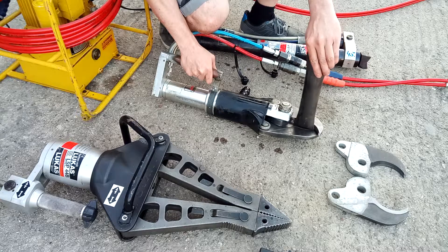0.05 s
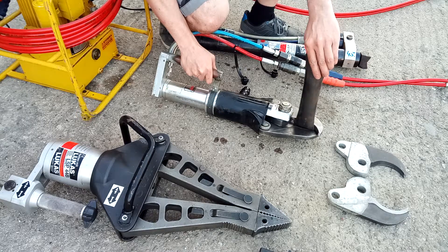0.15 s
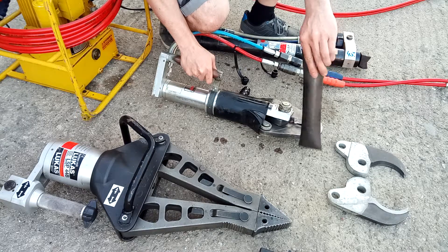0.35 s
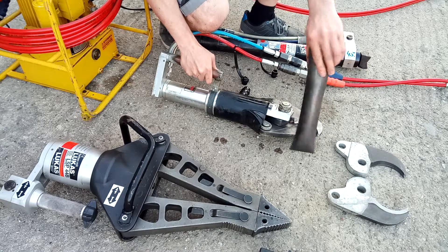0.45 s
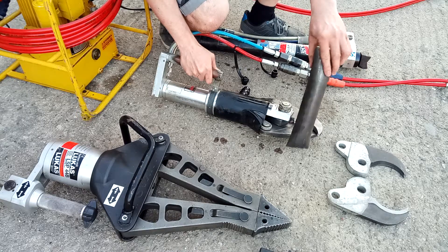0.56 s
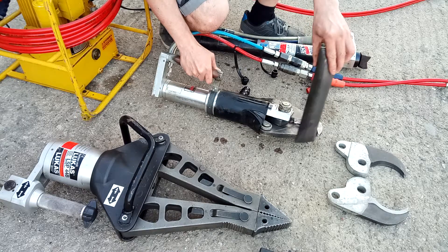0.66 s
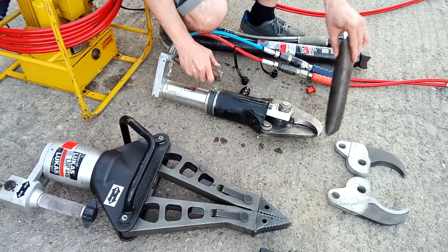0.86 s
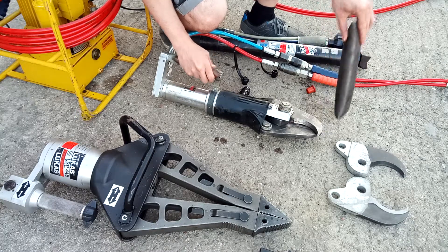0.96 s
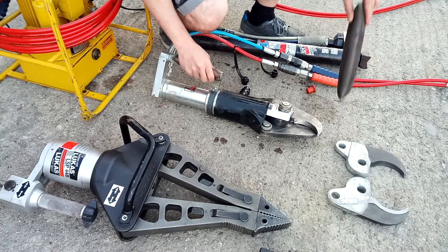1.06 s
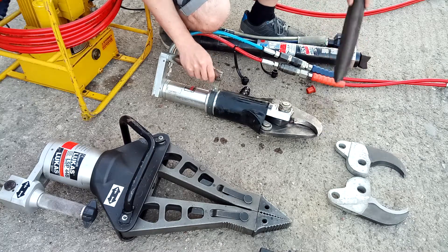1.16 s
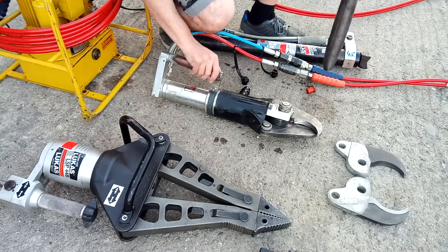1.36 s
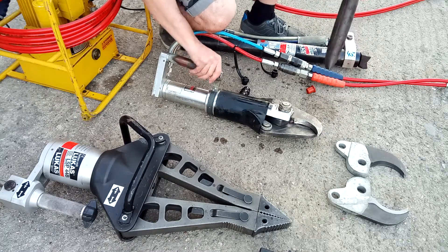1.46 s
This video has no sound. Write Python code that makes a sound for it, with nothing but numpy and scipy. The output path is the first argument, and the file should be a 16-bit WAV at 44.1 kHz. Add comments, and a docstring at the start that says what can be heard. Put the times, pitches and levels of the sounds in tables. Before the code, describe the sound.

A hydraulic pump hammers about 25 times a second for 1.5 seconds, ticking and squirting over a droning hum. Steel squeals thinly in the straining cutter at 0.1 seconds. Near 0.25 the bar snaps loudly, clanks against the jaws and rings briefly. The pump dips, quickens around 0.4, then settles. A fainter squeal follows from 1.0 to 1.3, while light air puffs rumble on the microphone.

```python
"""A hydraulic piston pump hammers about 25 times a second, ticking and squirting over a droning hum.
Its strokes ring a cutter that strains on a steel bar, until the bar snaps, clanks against the jaws
and rings; the unloaded pump briefly speeds up. A limiter ducks everything around the snap.
Steel squeals thinly twice, and light air movement rumbles on the microphone."""
import sys
import numpy as np
from scipy.fft import rfft, irfft, next_fast_len
from scipy.io import wavfile
from scipy.ndimage import uniform_filter1d, minimum_filter1d, map_coordinates

SR = 44100
rng = np.random.default_rng(int(sys.argv[2]) if len(sys.argv) > 2 else 0)


def unload_audio(sound):
    """Save the sound as a 16-bit wav file, at the path given as the first command line argument."""
    columns = np.transpose(np.atleast_2d(sound))
    # keep every value between -1 and 1, then stretch to whole-number steps
    steps = np.round(np.clip(columns, -1, 1) * 32767)
    wavfile.write(sys.argv[1], SR, steps.astype(np.int16))


N = 66150

# The stroke's mix as the load changes: time_s, tick_db, squirt_db, knock_db
STROKE_MIX = [(0, -22.5, -28.5, -27.5), (.24, -24, -29, -25), (.37, -21, -34, -29), (.42, -25, -21, -28.5),
              (.5, -26, -20, -20), (.58, -24, -23.5, -25.5), (.69, -27, -22.5, -27.5),
              (.75, -29, -25, -21.5), (.82, -21, -23, -17), (.9, -22.5, -22, -21.5), (.98, -23.5, -23, -22),
              (1.04, -26, -21.5, -28), (1.13, -28, -23.5, -26.5), (1.18, -22.5, -20.5, -30),
              (1.24, -30, -27, -25), (1.38, -27, -25, -27.5), (1.425, -21.5, -22, -26.5),
              (1.5, -38, -24, -24.5)]
# The squirt trails the tick further once the load is gone: time_s, lag_s
SQUIRT_LAG = [(0, .001), (.37, .0015), (.45, .006), (.66, .0065), (.82, .004), (1.5, .004)]
# Tone colours of the valve tick, oil squirt and churning: frequency_hz, gain_db
TICK_EQ = [(1500, -18.5), (3000, -13), (4000, -5), (4700, -2), (5600, 3.5), (6300, 5), (6900, -15.5),
           (7600, -13.5), (8200, -43), (9800, -19), (11000, -33), (15000, -37)]
SQUIRT_EQ = [(500, -22.5), (1400, -8.5), (2000, -11.5), (2600, 3), (3000, 2), (3900, -8), (4700, 2.5),
             (5200, 6.5), (6100, 2), (6900, -13), (7600, -15.5), (8200, -22), (9800, -25), (11000, -32),
             (15000, -40)]
CHURN_EQ = [(30, -57), (100, -2), (300, -5.5), (500, -5), (750, 10), (1200, 0), (1700, -4), (2300, 1.5),
            (3100, -4.5), (3900, -9.5), (5200, -0.5), (6200, -3), (7200, -22.5), (9000, -31), (13000, -39),
            (15500, -34)]
# Resonances of the bright casing and the hollow tank: pitch_hz, width_hz, gain_db
CASING_MODES = [(2235, 12, -3), (2274, 73, 0.5), (2900, 36, -5.5)]
TANK_MODES = [(644, 38, -3), (850, 75, 7), (1012, 63, 8.5), (1046, 110, -0.5), (1392, 27, 5.5)]

def pump(knock_lead_s=.0019, tank_lag_s=.0053, tank_db=-28, churn_db=-33):
    """Each stroke: a valve ticks, the casing knocks, oil squirts and the tank answers, over churning."""
    tick_db, squirt_db, knock_db = curves(STROKE_MIX)
    lag, = curves(SQUIRT_LAG)
    tick = coloured(stroke_noise(alike=.45), TICK_EQ) * amp(tick_db)
    tick *= stroke_envelope(0, attack_s=.0005, hold_s=.0025, decay_s=.0032, tail_db=-24.5, scatter_db=.5)
    squirt = coloured(stroke_noise(alike=.55), SQUIRT_EQ) * amp(squirt_db)
    squirt *= stroke_envelope(lag, attack_s=.0017, hold_s=.0047, decay_s=.0056,
                              tail_db=-21, scatter_db=-1.9)
    knock = stroke_noise(alike=.85) * amp(knock_db)
    knock *= stroke_envelope(lag - knock_lead_s, attack_s=.00044, hold_s=.0024, decay_s=.0028,
                             tail_db=-6, scatter_db=-1.5)
    thud = stroke_noise(alike=.66) * amp(tank_db)
    thud *= stroke_envelope(lag + tank_lag_s, attack_s=.00071, hold_s=.0039, decay_s=.0021,
                            tail_db=-19, scatter_db=1.5)
    churn = amp(churn_db) * coloured(stroke_noise(alike=.44), CHURN_EQ)
    return tick + squirt + resonate(knock, CASING_MODES) + resonate(thud, TANK_MODES) + churn


# The pump's tempo, with a surge after the snap: time_s, strokes_per_s
PUMP_TEMPO = [(0, 24.24), (.3, 24.56), (.43, 26.45), (.64, 24.23), (.9, 24.96), (1.25, 24.5), (1.5, 25.74)]

def stroke_clock(first_stroke_s=.0072):
    """For each sample: the number of the stroke and the seconds since it began."""
    rate, = curves(PUMP_TEMPO)
    turns = np.cumsum(rate) / SR + 1 - first_stroke_s * rate[0]
    return turns.astype(int), turns % 1 / rate


def stroke_noise(alike):
    """Noise in which a share of the power, alike, repeats with every stroke."""
    _, age = stroke_clock()
    repeating = rng.standard_normal(SR)[(age * SR).astype(int)]
    return np.sqrt(alike) * repeating + np.sqrt(1 - alike) * rng.standard_normal(N)


def stroke_envelope(delay_s, attack_s, hold_s, decay_s, tail_db, scatter_db, tail_s=.017):
    """Every stroke rises, holds, dies quickly and leaves a short tail, each at its own strength."""
    number, age = stroke_clock()
    t = np.maximum(age - delay_s, 0)
    fall = np.exp(-np.maximum(t - hold_s, 0) / decay_s) + amp(tail_db) * np.exp(-t / tail_s)
    strength = amp(scatter_db * rng.standard_normal(number[-1] + 1))[number]
    return strength * (1 - np.exp(-t / attack_s)) * fall


# The break, then the clank on the jaws: start_s, ring_db, crack_db
STEEL_HITS = [(0.2555, 9.5, 10.5), (.2722, 2, -1.5)]
# Modes of the bar and jaws, one list each: pitch_hz, level_db, t60_s
RING_HZ = [425, 1645, 2470, 3189, 3314, 3576, 3621, 3971, 4337, 4595, 4941, 5190, 5222, 5326, 5469, 5830,
           5870, 6192, 7400, 8400, 9500, 10750, 11810]
RING_DB = [-14.5, -6, -10, -21.5, -20, -19.5, -26, -4.5, -5.5, -18, -2, 9, -7.5, -10.5, -10.5, -1, -14,
           -6.5, -28, -23, -36.5, -30, -37]
RING_T60_S = [0.045, 0.02, 0.026, 0.49, 0.52, 0.53, 0.3, 0.041, 0.16, 0.06, 0.24, 0.066, 0.15, 0.079, 0.14,
              0.11, 0.23, 0.16, 0.3, 0.069, 0.14, 0.14, 0.15]
# Tone colours of the hard crack and the bright rattle: frequency_hz, gain_db
CRACK_EQ = [(150, -16), (600, -14), (1000, -4), (1700, -0.5), (2800, -3), (4200, -2), (5300, -7),
            (6300, -10), (7200, -9.5), (9000, -20.5), (12000, -25.5), (15000, -28)]
RATTLE_EQ = [(150, -31), (400, -22), (1200, -14), (2600, -14), (3400, -5), (4300, 1), (5200, 1), (6100, 4),
             (6900, -13), (7500, -18), (8000, -25), (11000, -28), (15000, -37)]

def snap(attack_s=.00089, wander_rad=.25):
    """The bar breaks and strikes the jaws: each blow is a crack, a dense rattle and ringing steel."""
    out = np.zeros(N)
    for start_s, ring_db, crack_db in STEEL_HITS:
        t = np.maximum(np.arange(N) / SR - start_s, 0)
        ring = sum(decay(t, db, t60_s) * np.sin(2 * np.pi * hz * t + wander_rad * wobble(118.1))
                   for hz, db, t60_s in zip(RING_HZ, RING_DB, RING_T60_S))
        rattle = coloured(rng.standard_normal(N), RATTLE_EQ)
        rattle *= decay(t, db=2, t60_s=.04) + decay(t, db=-19, t60_s=.52)  # loud clash, faint tail
        crack = coloured(rng.standard_normal(N), CRACK_EQ) * decay(t, crack_db, t60_s=.026) * (t > 0)
        out += (amp(ring_db) * ring + rattle) * (1 - np.exp(-t / attack_s)) + crack
    return out


# The hum's main tone: time_s, pitch_hz, level_db
HUM_TONE = [(0, 745, -34.5), (.15, 752.6, -34), (.23, 741, -30), (.33, 734.7, -28), (.46, 744.8, -35),
            (.57, 729, -35.5), (.68, 731.8, -32.5), (.86, 738, -27), (.96, 739, -39.5), (1.14, 744, -36.5),
            (1.33, 740, -28), (1.41, 736, -38), (1.5, 742, -25.5)]
# Its octave: time_s, level_db
HUM_OCTAVE = [(0, -44.5), (.22, -43.5), (.36, -43.5), (.52, -36.5), (.65, -55.5), (1.5, -49)]
# Narrow noise bands that roughen it: pitch_hz, width_hz, gain_db
HUM_BANDS = [(735, 17, -1), (830, 10.6, -4.5)]

def hum(side_hz=839, side_db=-42, rough_db=-6, waver_db=.6, wander_rad=.7, pulse_db=2, crest_s=.02):
    """A wavering tone with its octave, a side tone and narrow noise, swelling after every stroke."""
    hz, db = curves(HUM_TONE)
    octave_db, = curves(HUM_OCTAVE)
    rate, = curves(PUMP_TEMPO)
    _, age = stroke_clock()
    phase = 2 * np.pi * np.cumsum(hz) / SR
    tone = np.sin(phase) * amp(db + waver_db * wobble(30.6))
    octave = np.sin(2 * phase + wander_rad * wobble(38.7)) * amp(octave_db)
    side = np.sin(2 * np.pi * side_hz * np.arange(N) / SR + wander_rad * wobble(14.66)) * amp(side_db)
    rough = amp(db.mean() + rough_db) * resonate(rng.standard_normal(N), HUM_BANDS)
    pulse = amp(pulse_db * np.cos(2 * np.pi * rate * (age - crest_s)))
    return (np.sqrt(2) * (tone + octave + side) + rough) * pulse


# Resonances of the cutter while its jaws bite: pitch_hz, width_hz, gain_db
CUTTER_MODES = [(1770, 830, -9), (3200, 140, -2.5), (4630, 97, -1.5), (5350, 60, -16), (6406, 95, 0)]

def cutter(gain_db=-24.5):
    """Until the bar breaks, every stroke rings the strained cutter."""
    strokes = stroke_noise(alike=.51)
    strokes *= stroke_envelope(0, attack_s=.00074, hold_s=.002, decay_s=.0038, tail_db=-13, scatter_db=.4)
    biting = np.arange(N) / SR < STEEL_HITS[0][0]
    return amp(gain_db) * resonate(strokes * biting, CUTTER_MODES)


# One squeal before the snap, a fainter one well after: start_s, length_s, level_db
SQUEAL_CUES = [(0.097, 0.1, -37.5), (1.039, 0.28, -45.5)]

def squeals(pitch_hz=3150, wander_rad=.5):
    """Steel squeals on one thin, unsteady tone that fades in and out."""
    t = np.arange(N) / SR
    swell = sum(amp(db) * np.sin(np.pi * np.clip((t - start_s) / length_s, 0, 1))
                for start_s, length_s, db in SQUEAL_CUES)
    return swell * np.sqrt(2) * np.sin(2 * np.pi * pitch_hz * t + wander_rad * wobble(67))


# Rise and fall of the puffs: time_s, level_db
AIR_PUFFS = [(0, -73), (.2, -49), (.33, -62), (.43, -64), (.49, -44), (.62, -50.5), (.76, -40), (.82, -37),
             (.9, -32), (.96, -52), (1.04, -48), (1.075, -37), (1.12, -30.5), (1.15, -52), (1.35, -44.5),
             (1.43, -62), (1.5, -49)]
# Their bassy tone colour: frequency_hz, gain_db
AIR_EQ = [(20, -16), (35, -20), (52, -7.5), (90, 1.5), (140, -5.5), (220, -15), (400, -41), (1000, -70)]

def air(lumps_db=2):
    """Moving air buffets the microphone in soft, lumpy low puffs."""
    db, = curves(AIR_PUFFS)
    return amp(db + lumps_db * wobble(29.87)) * coloured(rng.standard_normal(N), AIR_EQ)


def amp(db):
    """Decibels to gain."""
    return 10 ** (np.asarray(db) / 20)


def decay(t, db, t60_s):
    """A gain that starts at db and falls 60 dB every t60_s."""
    return amp(db - 60 * t / t60_s)


def unit(x):
    """Scale to rms 1."""
    return x / np.sqrt(np.mean(x ** 2) + 1e-20)


def curves(rows):
    """One value per sample for each column after the time."""
    times, *columns = np.transpose(rows)
    return [np.interp(np.arange(N) / SR, times, column) for column in columns]


def wobble(rate):
    """A smooth random curve, rate knots a second."""
    knots = rng.standard_normal(int(N * rate / SR) + 4)
    return map_coordinates(knots, [np.arange(N) * rate / SR], mode="nearest")


def filtered(x, response):
    """x times a complex response of frequency."""
    size = next_fast_len(N + SR // 2)
    return irfft(rfft(x, size) * response(np.fft.rfftfreq(size, 1 / SR)), size)[:N]


def coloured(x, eq):
    """x through an EQ curve, at rms 1."""
    hz, db = np.transpose(eq)
    return unit(filtered(x, lambda f: amp(np.interp(np.log(f + 1), np.log(hz), db))))


def resonate(x, modes):
    """x through a set of resonances with steep upper skirts, keeping its rms."""
    def body(f):
        return sum(amp(db) * 1j * f * width / (hz * hz - f * f + 1j * f * width)
                   / (1 + (f / (1.63 * hz)) ** 8) for hz, width, db in modes)
    return np.std(x) * unit(filtered(x, body))


def scene(air_db=-1):
    """Pump, hum, cutter, squealing and breaking steel and air at one microphone."""
    return (pump() + hum() + cutter() + squeals() + snap() + amp(air_db) * air())[None]


def record(dry, ceiling_db=-3.5, recover_db_per_s=135, look_ahead_s=.016, top_hz=15800):
    """A look-ahead limiter ducks fast and recovers slowly; overshoots clip, then the top is cut."""
    x, ahead = dry[0], int(look_ahead_s * SR)
    power = np.abs(uniform_filter1d(x ** 2, size=180))
    over_db = np.maximum(10 * np.log10(power + 1e-12) - ceiling_db, 0)
    coming_db = -minimum_filter1d(-over_db, ahead, origin=-(ahead // 2))
    recovery = recover_db_per_s * np.arange(N) / SR
    duck_db = uniform_filter1d(np.maximum.accumulate(coming_db + recovery) - recovery, size=64)
    limited = np.clip(x * amp(-duck_db), -1, 1)
    return filtered(limited, lambda hz: hz < top_hz)[None]


dry = scene()
out = record(dry)
unload_audio(out)
```